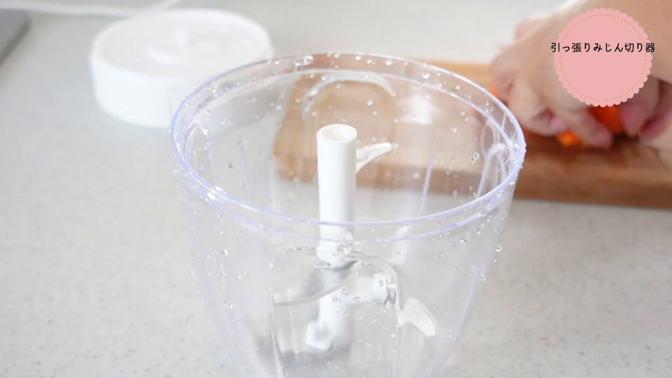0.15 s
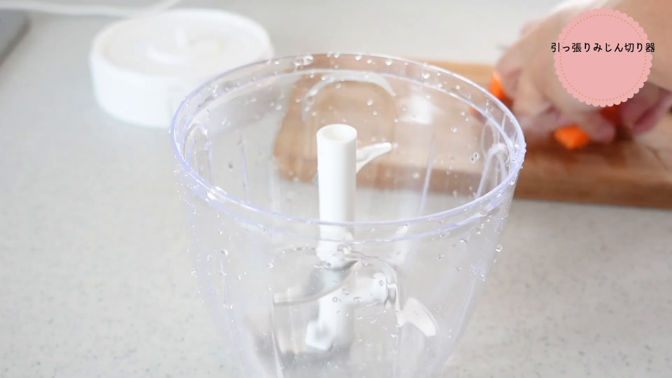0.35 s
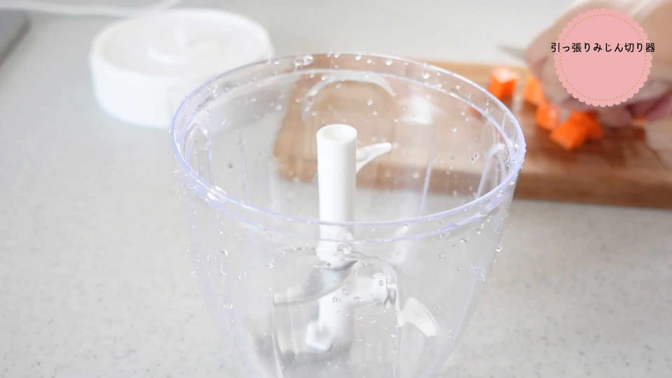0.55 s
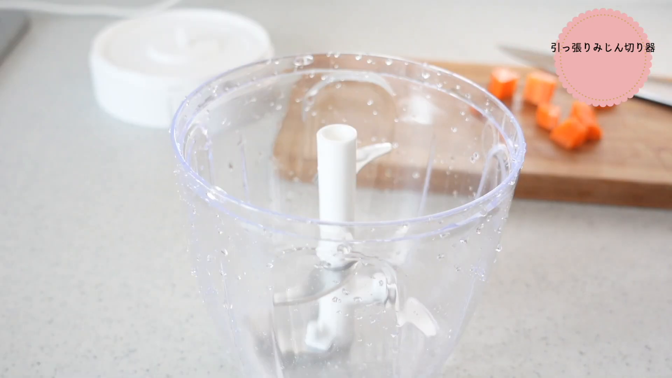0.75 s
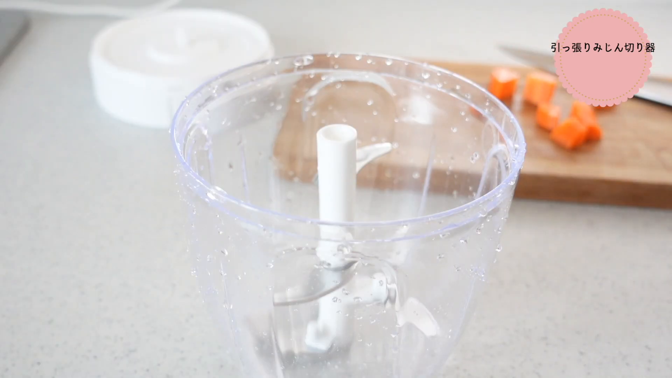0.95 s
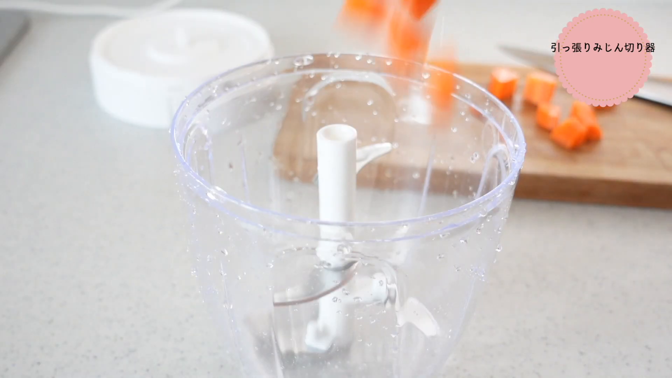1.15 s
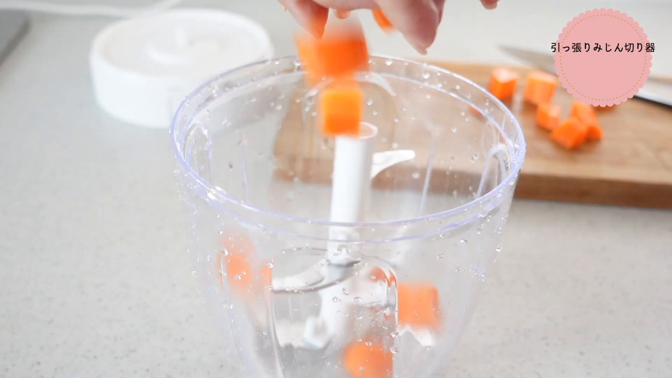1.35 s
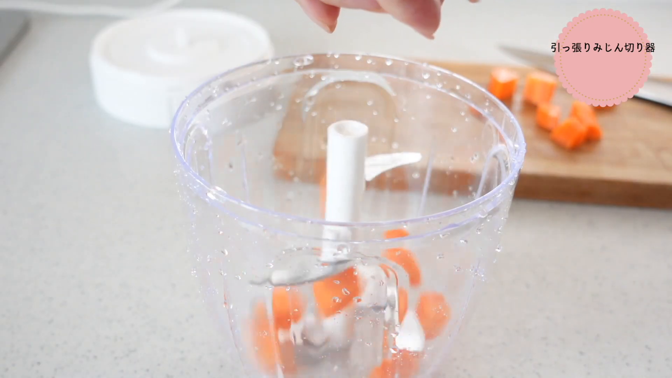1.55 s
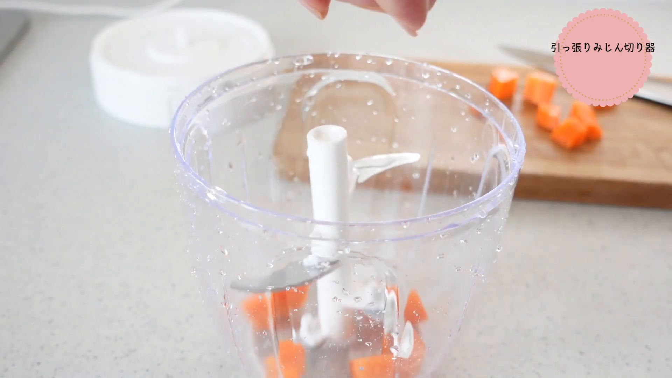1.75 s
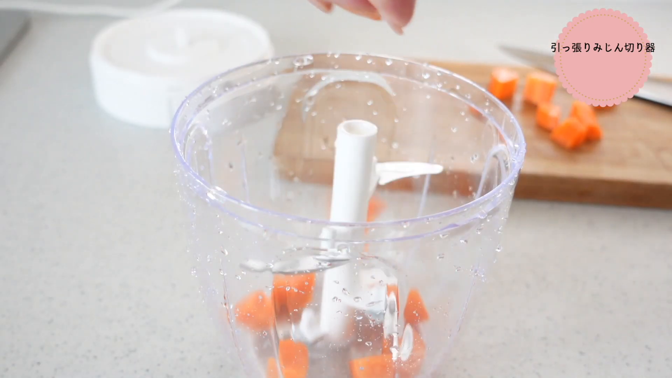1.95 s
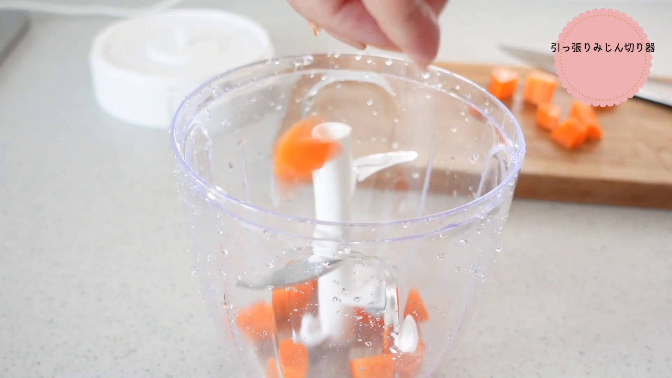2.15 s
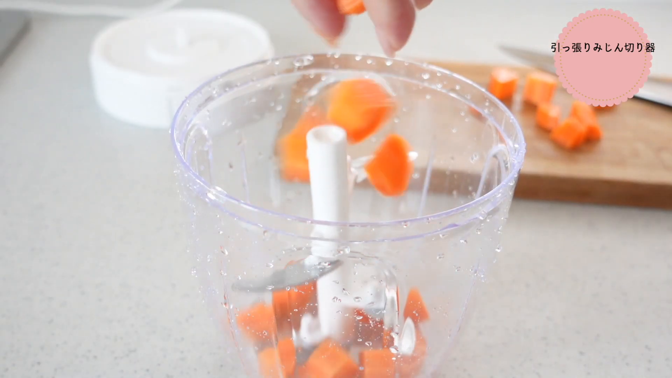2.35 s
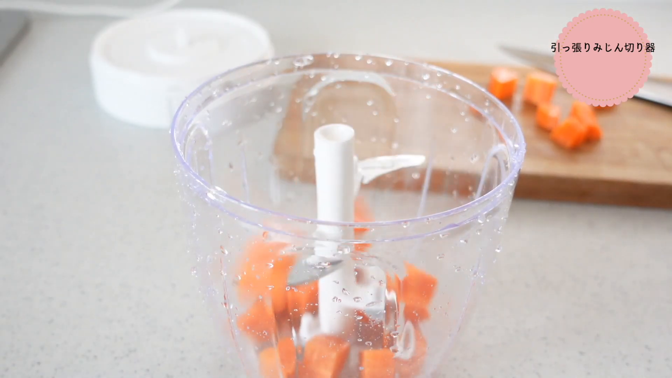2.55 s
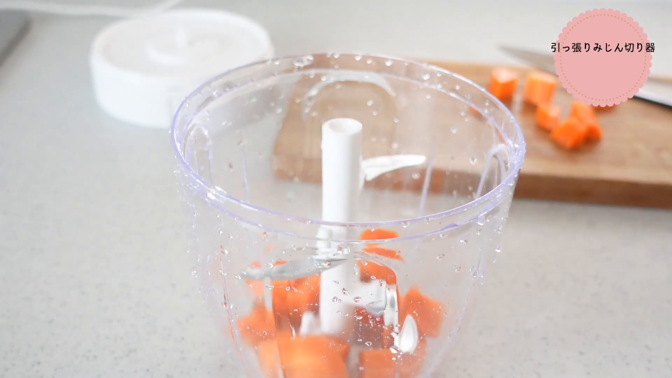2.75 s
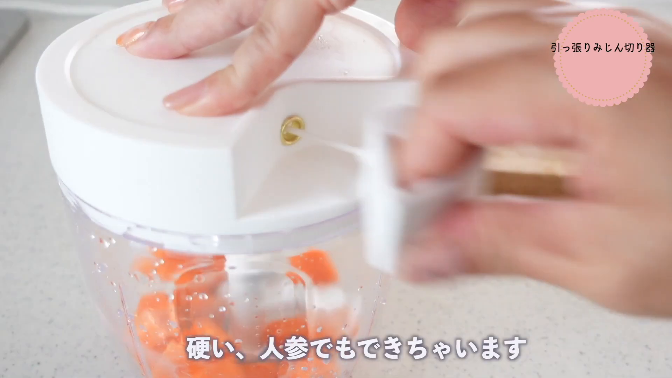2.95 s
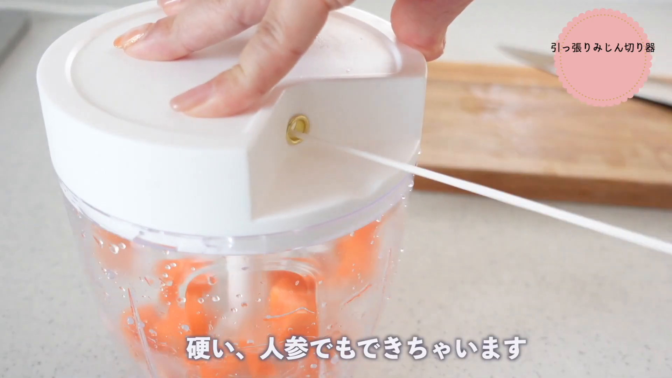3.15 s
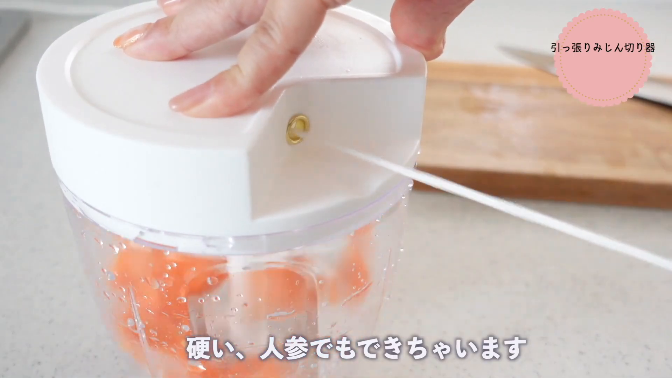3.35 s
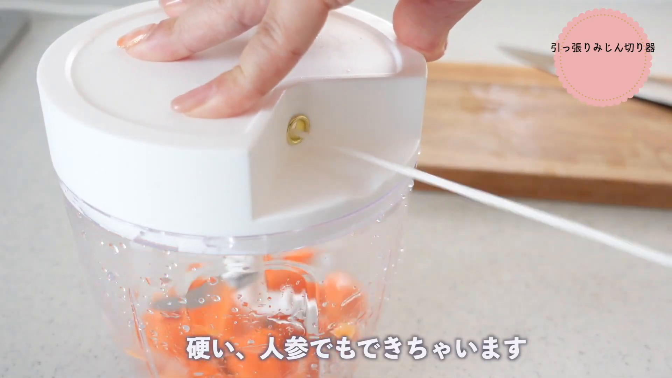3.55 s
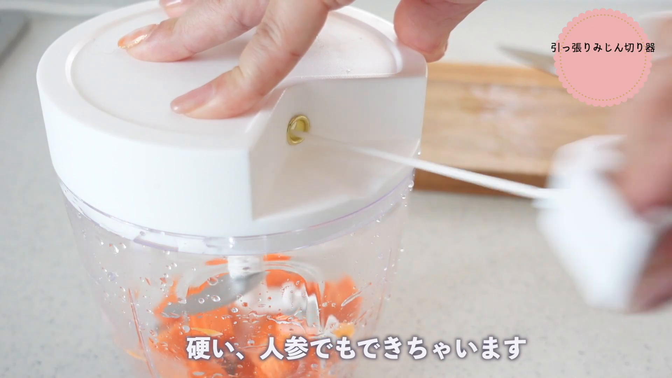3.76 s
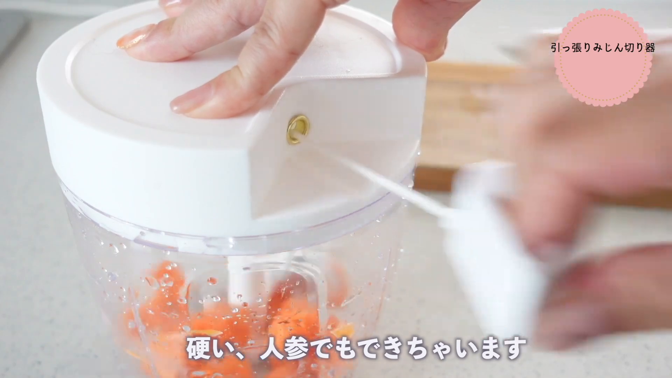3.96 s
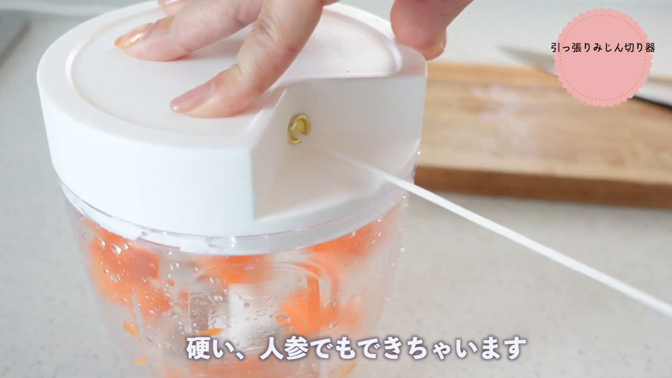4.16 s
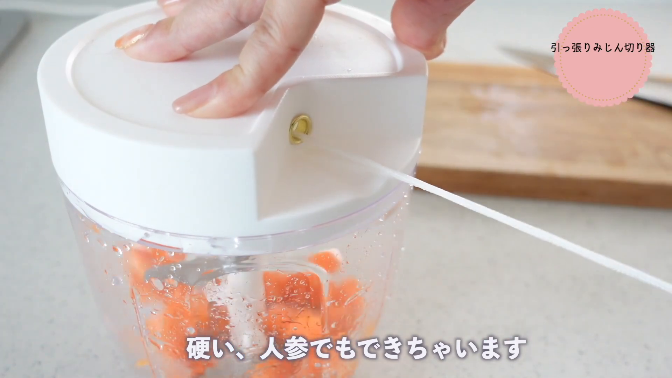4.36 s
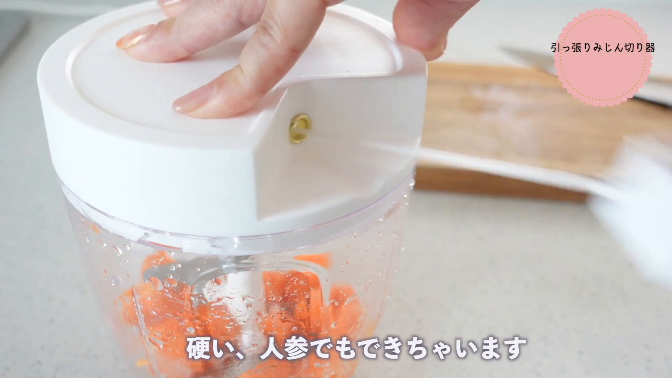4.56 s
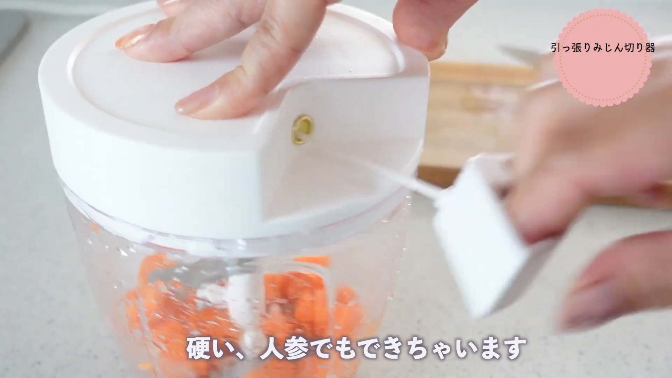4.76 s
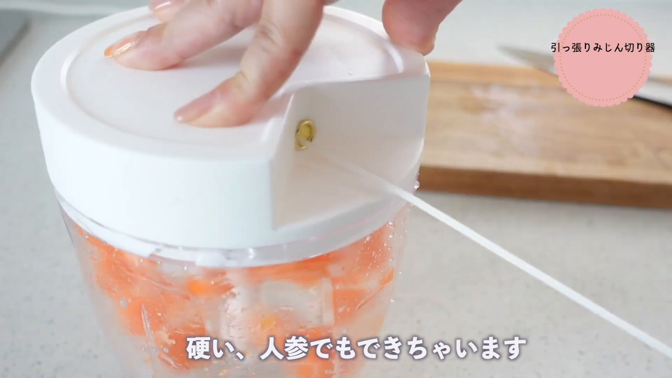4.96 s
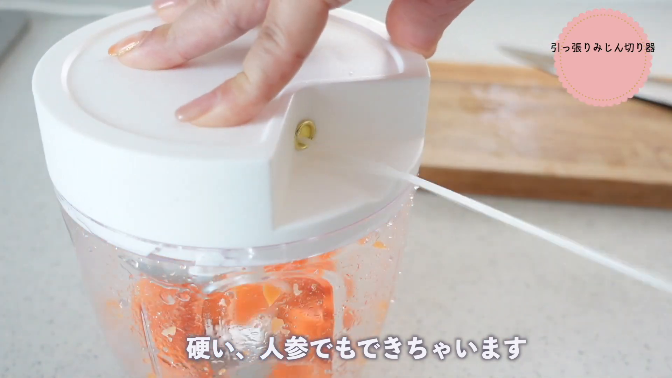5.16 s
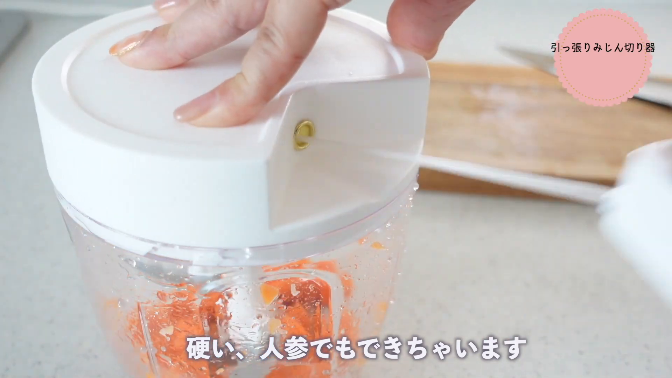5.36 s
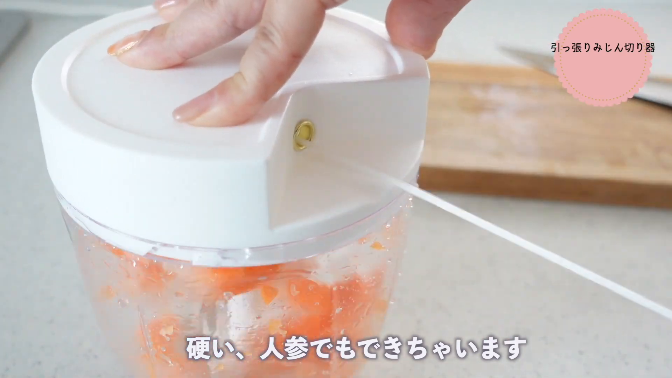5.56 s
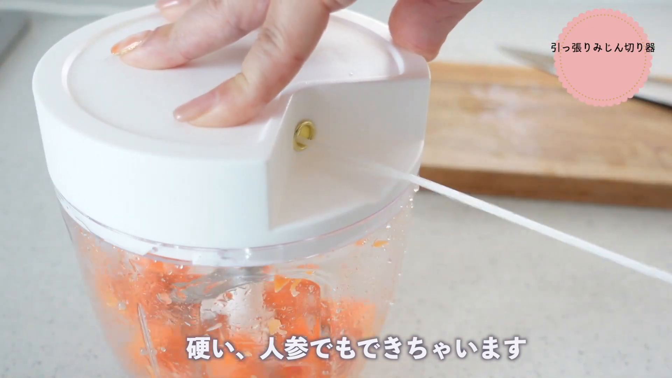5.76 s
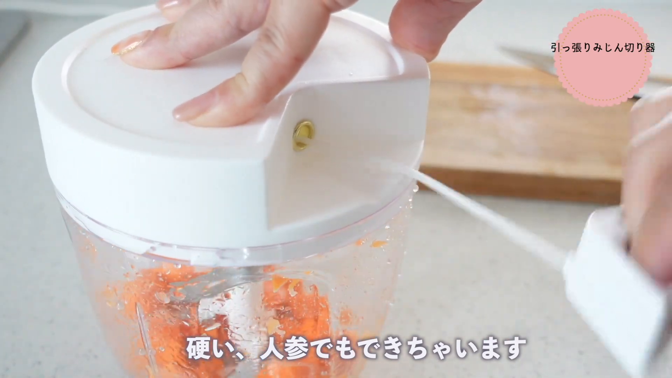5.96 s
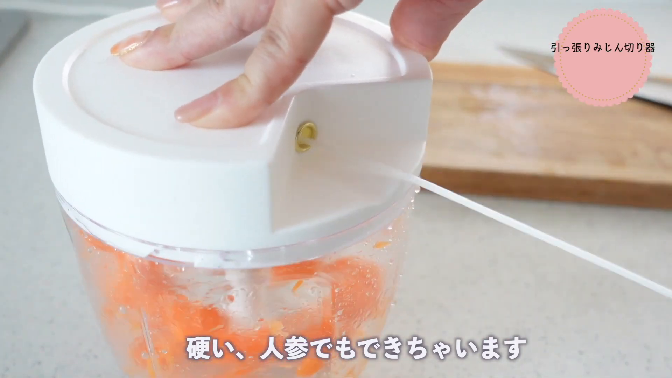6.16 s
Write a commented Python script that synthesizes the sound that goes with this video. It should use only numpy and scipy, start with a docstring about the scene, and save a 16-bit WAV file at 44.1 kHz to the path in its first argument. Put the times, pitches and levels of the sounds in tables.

```python
"""A pull-cord chopper on a kitchen counter: five yanks fling carrot pieces at the wall of its plastic bowl,
four rewinds run a ratchet, and reel and handle clack brightly on the lid.
First a hand gathers the cubes from a board and drops them in, so that bowl, shaft and blade ring.
Landings excite decaying sines; flung pieces, ratchet and hand are filtered grains; knocks are noise bursts.
A faint kitchen hush lies underneath, and a short room echo surrounds the near sounds."""
import sys
import numpy as np
from scipy import signal
from scipy.io import wavfile
from scipy.ndimage import uniform_filter1d

SR = 44100
rng = np.random.default_rng(int(sys.argv[2]) if len(sys.argv) > 2 else 0)


def master(y):
    """Save y as 16-bit WAV."""
    cut = np.clip(np.atleast_2d(y).T, -1, 1)
    pcm = np.round(cut * 32767)  # scale
    wavfile.write(sys.argv[1], SR, pcm.astype(np.int16))


N = 273420

# Quiet kitchen hush. Each row: frequency in Hz, relative spectrum level in dB.
HUSH_SPECTRUM = [(15, -73), (25, -47), (300, -12), (438, -12.5), (860, -4), (1560, -3), (2040, -2.5),
                 (2400, -10), (3410, -12), (4010, -8.5), (4460, -11.5), (9250, -21), (10000, -22.5),
                 (13100, -24), (15900, -33)]
HUSH_DB = -55.5

# Cubes pushed over the wood. Each row: start in seconds, length in seconds, level in dB.
SCUFFS = [(0.012, 0.044, -46.5), (0.285, 0.027, -51), (0.494, 0.0092, -37)]
# Fingers closing on the cubes. Each row: start in seconds, length in seconds, level in dB.
SQUEEZES = [(0.063, .08, -56.5), (0.267, 0.082, -43), (.365, 0.038, -41.5)]
SCUFF_RISE_S, SCUFF_FADE_DB_PER_S = 0.0051, 154
SQUEEZE_RISE_S, SQUEEZE_FADE_DB_PER_S = 0.042, 207
# Scuffed wood. Each row: frequency in Hz, relative spectrum level in dB.
SCUFF_SPECTRUM = [(88, -38), (150, -20), (805, 0), (1100, -6.5), (1710, -8), (2420, -41), (3000, -31),
                  (3900, -61), (6600, -120)]
# Wet crackle between the fingers. Each row: frequency in Hz, relative spectrum level in dB.
CRACKLE_SPECTRUM = [(1180, -18), (2000, -8), (2430, -18), (2970, -12.5), (4460, -9), (7260, -4),
                    (13300, -25.5), (15000, -34)]
# Cubes tapping on wood. Each row: start in seconds, level in dB, snap in Hz, relative decay in seconds.
BOARD_TAPS = [(.044, -29, 2020, .005), (.289, -23.5, 1500, 0.017), (.474, -29, 1550, .005),
              (.501, -25, 1560, 0.0046), (.521, -30, 1660, .005)]
# Thin ticks from the board. Each row: start in seconds, level in dB, snap in Hz, relative decay in seconds.
BOARD_TICKS = [(.386, -35, 4980, 0.0055), (1.001, -20, 3600, .002), (1.01, -36, 3720, .004)]
# Four kinds of blow. Each holds: body, snap and sizzle in dB, added to the level of the blow.
DULL_BLOW = (-12, -11, -26)
BRIGHT_BLOW = (-12, -10, -11.5)
SOFT_BLOW = (-10, -27, -31)
THIN_BLOW = (-33, -10.5, -46)

# Cubes landing in the bowl. Each row: start in seconds, ring in dB, part that rings most,
# clatter on the wall in dB, treble tick in dB.
LANDINGS = [(1.239, -21, "shaft", -40, -30.5), (1.258, -11.5, "shaft", -29, -37),
            (1.265, -6, "shaft", -11, -30), (1.274, -6.5, "shaft", -13, -26),
            (1.304, -11.5, "shaft", -23, -29), (1.34, 0, "shaft", -14.5, -23),
            (1.352, -3.5, "shaft", -4, -27), (1.377, -4, "foot", -12, -34), (1.398, -3, "shaft", -7.5, -18),
            (1.425, -7.5, "shaft", -22.5, -20.5), (1.439, -6, "shaft", -24, -29),
            (1.48, -7, "shaft", -16, -37), (1.506, -4.5, "shaft", -21, -17),
            (1.527, -3.5, "foot", -19, -26), (1.545, -14.5, "shaft", -38.5, -29),
            (1.565, -5, "shaft", -24, -30), (1.592, -3, "foot", -30, -22), (1.602, -8, "shaft", -20, -21.5),
            (1.635, -2, "foot", -26, -24), (1.661, -32, "shaft", -16, -40),
            (1.679, -19, "shaft", -24, -25.5), (1.72, -22.5, "bottom", -33, -37.5),
            (1.734, -36, "bottom", -28, -46), (1.748, -20.5, "foot", -47, -38.5),
            (1.777, -21, "bottom", -48, -51), (1.804, -21, "foot", -46, -39.5),
            (1.918, -7.5, "foot", -10, -30.5), (1.927, -18, "bottom", -32, -42),
            (2.016, -18, "bottom", -20.5, -58), (2.033, -7.5, "foot", -15.5, -26.5),
            (2.178, -1.5, "bottom", -19, -41), (2.187, -25, "shaft", -20, -39),
            (2.249, -21, "bottom", -61, -70), (2.268, -1.5, "blade", -19, -24),
            (2.282, -3.5, "blade", -10, -26), (2.349, -44, "bottom", -43, -68),
            (2.366, -2.5, "bottom", -19.5, -52), (2.373, -7, "blade", -20, -30.5),
            (2.385, 1, "bottom", -32, -51), (2.397, -3.5, "bottom", -7, -21.5),
            (2.433, -28, "blade", -18, -29.5), (2.457, -30, "bottom", -50, -30.5),
            (2.47, -3.5, "bottom", -33, -22), (2.486, -38, "foot", -12.5, -50.5),
            (2.503, -8.5, "bottom", -11.5, -27), (2.519, -42, "blade", -24, -53),
            (2.54, -3, "bottom", -31, -23.5), (2.554, -29, "bottom", -20, -24),
            (2.584, -19, "bottom", -43, -55.5), (2.615, -7.5, "blade", -27, -35.5),
            (2.63, -5.5, "blade", -18.5, -31), (2.65, -6.5, "blade", -27, -39),
            (2.713, -32, "foot", -33, -38.5), (2.796, -20, "bottom", -49, -47),
            (2.825, -38, "bottom", -46, -45.5)]
# What a blow on one part passes on. Each entry: part struck, then dB to bottom, blade and shaft.
PASSED_ON = {"shaft": (-15, -17.5, -3), "foot": (-4.5, -23.5, -10.5), "bottom": (-3.5, -21.5, -29),
             "blade": (-11.5, -8.5, -21.5)}
# Rings of the open bowl's bottom. Each row: frequency in Hz, relative level in dB, t60 in seconds.
BOTTOM_MODES = [(547, -13, 0.046), (664, -3.5, 0.021), (688, -0.5, 0.041), (728, -6, 0.011)]
# Rings of the shaft. Each row: frequency in Hz, relative level in dB, t60 in seconds.
SHAFT_MODES = [(1870, -11, 0.079), (1941, -6.5, 0.099), (1972, 0, 0.055), (2073, -9.5, 0.045),
               (2280, -18.5, 0.14)]
# Rings of the bowl wall. Each row: frequency in Hz, relative level in dB, t60 in seconds.
WALL_MODES = [(1450, -11, .035), (2420, -9, .045), (2670, -10, .04), (2930, -6, .07), (3250, -9, .035),
              (3730, -8, .045), (4060, -9, .04), (4450, -12, .04), (5100, -11, .035), (5720, -13, .035),
              (6600, -16, .025)]
# Bowl rocking on the counter. Each row: frequency in Hz, relative level in dB, t60 in seconds.
ROCKING_MODES = [(138, -23, 0.15), (191, -1, 0.092), (203, -22, 0.19), (279, 6, 0.084), (337.3, 2, 0.18)]
# Treble tick of a landing. Each row: frequency in Hz, relative spectrum level in dB.
TICK_SPECTRUM = [(59, -76), (100, -44), (265, -21), (460, -14), (718, -4.5), (907, -12.5), (4550, -16),
                 (12300, -39.5), (15900, -27)]
BLADE_HZ, BLADE_T60_S = 1066, 0.368  # the steel blade sings one note
TUMBLE_DB, SETTLE_DB_PER_S, TUMBLE_LEAST_DB = -21.5, 112, -52  # each landing stirs the pile, which then settles
SHAFT_GRAZE_DB = -14  # tumbling cubes barely touch the shaft

# Pulls; the first three rows are one pull that jams twice on whole cubes. Each row: start in seconds,
# spin-up in seconds, length in seconds, big chunks in dB, fine bits in dB, chunks coasting down in dB per second.
PULLS = [(2.922, .12, 0.15, -25, -26, 249), (3.094, 0.0046, 0.023, -24.5, -25, 250),
         (3.127, 0.031, .32, -20.5, -21, 86), (3.989, .065, .28, -19.5, -19, 114),
         (4.835, 0.021, 0.23, -20, -18.5, 97), (5.483, 0.055, 0.18, -19.5, -18, 80),
         (6.075, 0.052, .14, -20.5, -19, 90)]
BITS_SOONER, GEAR_SOONER = 1.58, 2.5  # how many times faster than the chunks they die away
GEAR_DB = -17.5  # the pawl buzzes under a pull, against the fine bits
# Rewinds. Each row: start in seconds, length in seconds, ratchet in dB, shaken chunks in dB,
# shaken bits in dB, running out in dB per second.
REWINDS = [(3.534, 0.26, -29, -26, -26, 89), (4.453, 0.12, -25.5, -22, -22, 104),
           (5.162, 0.17, -27, -28, -24.5, 127), (5.738, .22, -27.5, -27, -27, 240)]
REWIND_RISE_S, REWIND_SAG_DB = 0.054, -5.5
# Blade meeting the pile. Each row: time in seconds, mean passes per second, depth of the pulsing from 0 to 1.
BLADE_PASSES = [(2.98, 26, 0.93), (3.32, 25.6, 1), (3.501, 30, 0.4), (4.001, 40, 0), (6.2, 52, 0.02)]
# Big chunks. Each row: frequency in Hz, relative spectrum level in dB.
CHUNK_SPECTRUM = [(15, -82), (25, -70), (96, -38.5), (189, -21.5), (230, -23), (295, -11.5), (649, -2.5),
                  (980, 1.5), (1800, -6.5), (2340, -28), (3960, -120)]
# Fine bits. Each row: frequency in Hz, relative spectrum level in dB.
BIT_SPECTRUM = [(760, -29.5), (1300, -6), (2130, -6.5), (2410, -2), (2730, -4.5), (3780, -3), (6520, -12),
                (15900, -47)]
# Resonances of the shut bowl. Each row: frequency in Hz, width in Hz, relative lift in dB.
SHUT_BOWL_PEAKS = [(620, 130, -6), (1086, 170, -11), (1930, 79, -0.5), (2450, 280, -7.5), (3100, 54, -7),
                   (3730, 58, -5), (6380, 110, -4), (7500, 79, -46)]
# Ratchet. Each row: frequency in Hz, relative spectrum level in dB.
RATCHET_SPECTRUM = [(880, -30), (1500, -1), (3400, -13.5), (4360, 5.5), (5150, -3), (7720, -3), (10100, -7),
                    (11500, -8), (15900, -19.5)]
# Resonances of the pawl. Each row: frequency in Hz, width in Hz, relative lift in dB.
PAWL_PEAKS = [(2450, 340, -19), (4330, 200, -7.5), (5530, 190, -10), (6900, 270, -4.5), (7730, 370, -3.5),
              (7970, 100, -10), (9260, 170, -10), (11100, 210, -12.5)]
TEETH_PER_S = 105  # mean rate
# Dull knocks of big chunks and of the cord taking up the load. Each row: start in seconds, level in dB,
# snap in Hz, relative decay in seconds.
DULL_KNOCKS = [(2.928, -20, 1740, 0.012), (2.975, -12, 2410, .01), (3.02, -6, 3730, 0.039),
               (3.051, -9.5, 1950, 0.0069), (3.096, -11, 2150, 0.0029), (3.105, -13, 3640, 0.0029),
               (3.132, -7.5, 2480, 0.009), (3.166, -7, 2450, .011), (3.192, -8, 2390, 0.0091),
               (3.22, -9, 2400, .014), (3.252, -5, 2420, 0.013), (3.289, -5.5, 2420, 0.028),
               (3.414, -15, 2470, .015), (3.994, -13.5, 1875, 0.0079), (4.265, -14, 2400, .01),
               (4.3, -15, 2400, .007), (4.338, -13.5, 1900, 0.0051), (4.385, -20, 2000, 0.0053),
               (4.45, -19, 1670, 0.0068), (4.622, -18, 2400, 0.0092), (4.68, -20, 2400, 0.0081),
               (4.793, -8.5, 2800, 0.0075), (4.821, -16, 2700, 0.0058), (4.843, -4.5, 2020, 0.015),
               (5.372, -25, 1960, 0.005), (5.527, -12, 1710, 0.0054), (5.806, -6, 2550, .006),
               (5.904, -8.5, 1620, 0.018), (5.962, -27, 2500, 0.0098), (6.03, -4.5, 2840, 0.0048),
               (6.067, -9.5, 4400, 0.0068), (6.157, -4, 2520, 0.035)]
# Bright clacks of reel and handle on the lid. Each row: start in seconds, level in dB, snap in Hz,
# relative decay in seconds.
LID_CLACKS = [(3.438, -9, 3870, 0.034), (3.56, -10, 2440, 0.015), (3.653, -9, 4300, 0.018),
              (3.669, -10, 4300, 0.0083), (3.74, -2.5, 1560, 0.012), (3.96, -4, 4440, 0.011),
              (4.02, -7.5, 2450, 0.038), (4.44, -21, 3020, 0.0076), (4.472, -8.5, 4480, 0.013),
              (4.512, -4, 1560, 0.014), (4.555, -5.5, 2440, 0.012), (4.752, -5, 4300, 0.0085),
              (4.863, -6, 1700, 0.014), (5.186, -20, 1630, 0.014), (5.204, -22, 2440, 0.011),
              (5.333, -6, 1830, .008), (5.466, -3.5, 1600, 0.012), (6.023, -21, 4400, 0.0028),
              (6.061, -20, 4400, 0.0017)]

# Room echo. Each row: frequency in Hz, t60 in seconds.
ROOM_T60 = [(125, 1), (500, 0.35), (2000, 0.3), (6000, 0.27), (14000, 0.58)]
# Colour of the spread sound in the side signal. Each row: frequency in Hz, gain in dB.
SIDE_SPECTRUM = [(60, -42), (180, -39), (550, -11.5), (1650, -18), (4970, -24.5), (15000, -22)]
EDGE_HZ = 15900  # upper band limit


def amp(db):
    """Decibels to linear gain."""
    return 10 ** (np.asarray(db) / 20)


def evened(x):
    """Scale to an RMS of one."""
    return x / np.sqrt(np.mean(x ** 2) + 1e-20)


def read(points, hz):
    """Read a curve between its points, on a log frequency axis."""
    f, value = np.transpose(points)
    return np.interp(np.log(hz + 1), np.log(f + 1), value)


def colour(x, points, peaks=(), lift_db=0.):
    """Causal minimum-phase filter: a spectrum, with resonances lifted above it."""
    hz = np.abs(np.fft.fftfreq(8192, 1 / SR))
    gain = amp(np.maximum(read(points, hz), -100))
    lift = sum(amp(lift_db + db) / (1 + (2 * (hz - f) / width) ** 2) for f, width, db in peaks)
    gain = gain * (1 + lift)
    minimum_phase = np.exp(np.conj(signal.hilbert(np.log(gain))))
    taps = np.fft.ifft(minimum_phase).real[:4096]
    return signal.oaconvolve(x, taps)[:len(x)]


def band(x, lo_hz, hi_hz, order=2):
    """Keep only what lies between two frequencies."""
    return signal.sosfilt(signal.butter(order, [lo_hz, hi_hz], "bandpass", fs=SR, output="sos"), x)


def swell(start, rise_s, length, db, fall_db_per_s, sag_db=0.):
    """Gain over time: a straight rise, a hold that can sag, then a steady fall in dB."""
    t = np.arange(0, N, 16) / SR - start  # one value per 16 samples
    fall_db = fall_db_per_s * np.maximum(t - length, 0)
    level_db = db + sag_db * np.clip(t / length, 0, 1) - fall_db
    gain = np.clip(t / rise_s, 0, 1) * amp(level_db)
    return np.repeat(gain, 16)[:N]


def grains(per_s, spread_db, cycles, count=32):
    """Random impacts, a few of them large, each a short ring at one of many pitches."""
    size = amp(spread_db * np.minimum(rng.exponential(1, N), 3)) * (rng.random(N) < per_s / SR)
    size *= rng.choice([-1, 1], N)
    kind = rng.integers(0, count, N)
    t = np.arange(2048) / SR
    hz = np.geomspace(150, 15000, count)[:, None]
    rings = hz * np.sin(2 * np.pi * hz * t) * np.exp(-hz * t / cycles)
    return evened(sum(signal.oaconvolve(size * (kind == k), rings[k])[:N] for k in range(count)))


def puffs(blows, length_s):
    """A dying burst of noise after every blow."""
    envelope = signal.lfilter([1], [1, -np.exp(-1 / (length_s * SR))], blows)
    return rng.standard_normal(N) * envelope


def kitchen_hush():
    """Steady coloured noise, independent in mid and side."""
    return [amp(HUSH_DB) * evened(colour(x, HUSH_SPECTRUM)) for x in rng.standard_normal((2, N))]


def hand():
    """Cubes scuff and tap the wood and crackle wetly between the fingers."""
    scuff = evened(colour(grains(5000, 2.4, 3.6), SCUFF_SPECTRUM))
    scuff = scuff * sum(swell(s, SCUFF_RISE_S, length, db, SCUFF_FADE_DB_PER_S)
                        for s, length, db in SCUFFS)
    crackle = evened(colour(grains(8000, 1.6, 2.5), CRACKLE_SPECTRUM))
    crackle = crackle * sum(swell(s, SQUEEZE_RISE_S, length, db, SQUEEZE_FADE_DB_PER_S)
                            for s, length, db in SQUEEZES)
    return scuff + crackle + knocks(BOARD_TAPS, SOFT_BLOW) + knocks(BOARD_TICKS, THIN_BLOW)


def knocks(rows, kind, snap_width=1.21):
    """Short noise bursts with body, snap and sizzle, the higher parts dying faster."""
    out = np.zeros(N)
    t = np.arange(4096) / SR
    rise = 1 - np.exp(-t / .0002)
    wide = max(snap_width, 1.05)
    body_db, snap_db, sizzle_db = kind
    for s, level_db, snap_hz, decay_s in rows:
        decay_s = max(decay_s, .001)
        noise = rng.standard_normal((3, len(t)))
        # level in dB, band edges in Hz, share of the decay
        parts = [(body_db, 500, 1500, 1.2),
                 (snap_db, snap_hz / wide, snap_hz * wide, .8),
                 (sizzle_db, 4000, 13000, .7)]
        for x, (db, lo_hz, hi_hz, share) in zip(noise, parts):
            burst = band(x * np.exp(-t / (share * decay_s)) * rise, lo_hz, hi_hz, order=1)
            burst *= np.sqrt(0.0022 * SR) / np.linalg.norm(burst)  # same energy whatever the decay
            place = out[round(s * SR):][:len(t)]
            place += amp(level_db + db) * burst[:len(place)]
    return band(out, 350, 8300)


def drops(rattle_s=0.0086, rattle_per_s=600, rattle_db=-7.5, rolling_per_s=120):
    """Each cube strikes, then chatters for a few ms; smaller tumbles fill the gaps and rock the bowl."""
    # columns: start, level, dB passed to bottom, blade and shaft, then wall and tick against the level
    rows = np.array([(s, db, *PASSED_ON[part], wall_db - db, tick_db - db)
                     for s, db, part, wall_db, tick_db in LANDINGS])
    t = np.arange(2048) / SR
    draw = rng.random((len(rows), len(t)))
    chatter = amp(rattle_db) * (draw < rattle_per_s / SR) * np.exp(-t / rattle_s)
    chatter[:, 0] = 1  # the strike itself
    tumbles = stirred(rows) * (rng.random(N) < rolling_per_s / SR) * rng.exponential(1, N)

    def blows(column, tumble_db, size=len(t)):
        """Strikes, chatter and tumbles as one part receives them."""
        train = amp(tumble_db) * tumbles
        for row, hits in zip(rows, chatter):
            train[round(row[0] * SR):][:size] += amp(row[1] + row[column]) * hits[:size]
        return train

    wall_blows = blows(5, 2.0)
    first_touch = amp(-9.0) * band(blows(5, 10.0, size=1), 1800, 4500, order=1)  # sharp crack, no chatter
    rings = amp(-3.5) * ring(blows(2, 0.51), BOTTOM_MODES)
    rings += amp(-8.0) * blade(rows)
    rings += amp(-6.5) * ring(blows(4, SHAFT_GRAZE_DB), SHAFT_MODES)
    rings += amp(-9.5) * ring(wall_blows, WALL_MODES, 3.9)
    clatter = amp(-6.5) * band(puffs(wall_blows, 0.0061), 2300, 4040)
    ticks = amp(27.0) * colour(puffs(blows(6, -24.0), 0.0028), TICK_SPECTRUM)
    rocking = band(ring(amp(-24.5) * tumbles, ROCKING_MODES), 125, 340)
    return band(rings + first_touch + clatter + ticks, 715, 10100, order=3) + rocking


def stirred(rows):
    """Gain of the tumbling pile: up with a landing, down as it settles to a floor, silent from the first pull."""
    t = np.arange(N) / SR
    kick_db = np.full(N, -200.)
    kick_db[np.round(rows[:, 0] * SR).astype(int)] = rows[:, 1] + rows[:, 2:].max(1) + TUMBLE_DB
    settling_db = SETTLE_DB_PER_S * t
    held_db = np.maximum.accumulate(kick_db + settling_db) - settling_db
    dropping = (t > rows[0, 0]) * (t < PULLS[0][0])
    return amp(np.maximum(held_db, TUMBLE_LEAST_DB)) * dropping


def ring(blows, modes, spot_db=4.5):
    """Every blow lands on another spot, so each decaying mode answers with its own random weight."""
    t = np.arange(SR // 2) / SR
    out = np.zeros(N)
    for hz, db, t60 in modes:
        weight = rng.choice([-1, 1], N) * amp(spot_db * rng.standard_normal(N))
        mode = amp(db - 60 * t / t60) * np.sin(2 * np.pi * hz * t)
        out += signal.oaconvolve(blows * weight, mode)[:N]
    return out


def blade(rows):
    """A stronger strike takes over the blade's note with a fresh phase; a weaker one leaves it ringing."""
    t = np.arange(N) / SR
    at = np.round(rows[:, 0] * SR).astype(int)
    fall_db = 60 * t / BLADE_T60_S
    strike_db, phase = np.full(N, -200.), np.zeros(N)
    strike_db[at] = rows[:, 1] + rows[:, 3]
    phase[at] = 2 * np.pi * rng.random(len(at))
    held_db = np.maximum.accumulate(strike_db + fall_db)
    phase = np.cumsum(phase * (strike_db + fall_db >= held_db))  # only winning strikes shift it
    envelope = uniform_filter1d(amp(held_db - fall_db), 60)
    return envelope * np.sin(2 * np.pi * BLADE_HZ * t + phase)


def cord():
    """Gains of chunks, bits and ratchet over all pulls and rewinds."""
    gains = np.zeros((3, N))
    for start, rise_s, length, chunks_db, bits_db, coast in PULLS:
        layers = ((chunks_db, 1), (bits_db, BITS_SOONER), (bits_db + GEAR_DB, GEAR_SOONER))
        gains += [swell(start, rise_s, length, db, coast * sooner) for db, sooner in layers]
    for start, length, ratchet_db, chunks_db, bits_db, fall in REWINDS:
        gains += [swell(start, REWIND_RISE_S, length, db, fall, REWIND_SAG_DB)
                  for db in (chunks_db, bits_db, ratchet_db)]
    return gains


def flung(chunks_gain, bits_gain):
    """The spinning blade throws pieces at the wall: knocks of chunks and a hail of bits in the shut bowl."""
    passes = sweeps()
    chunks = passes * grains(4000, 3.2, 2.1) + amp(-6.5) * grains(400, 4.1, 2.76)
    bits = passes * grains(6000, 1.7, 1.56) + amp(-6.0) * grains(600, 2.8, 4.4)
    chunks = evened(colour(chunks, CHUNK_SPECTRUM, SHUT_BOWL_PEAKS, 0.96))
    bits = evened(colour(bits, BIT_SPECTRUM, SHUT_BOWL_PEAKS, 4.1))
    return chunks_gain * chunks + bits_gain * bits


def sweeps(jitter=0.131):
    """Each pass of a blade throws up a burst that thins until the next pass."""
    s, per_s, depth = np.transpose(BLADE_PASSES)
    t = np.arange(N) / SR
    wander = evened(uniform_filter1d(rng.standard_normal(N), 800))
    rate = np.interp(t, s, per_s) * (1 + jitter * wander)
    turns = np.cumsum(rate * (t > s[0])) / SR
    depth = np.clip(np.interp(t, s, depth), 0, 1)
    burst = uniform_filter1d(np.exp(-(turns % 1) / 0.84), 60)
    return evened(1 - depth + 2 * depth * burst)


def ratchet(gain, jitter=0.29, slip_db=-3.0):
    """The reel drags a pawl over its teeth at a wandering rate; the cord rasps between the clicks."""
    wander = evened(uniform_filter1d(rng.standard_normal(N), 400))
    turns = np.cumsum(TEETH_PER_S * (1 + jitter * wander)) / SR
    teeth = np.diff(np.floor(turns), prepend=0) * amp(3. * rng.standard_normal(N))
    drag = evened(puffs(teeth, 0.0057)) + amp(slip_db) * grains(6000, 0.61, 4.5)
    return gain * evened(colour(drag, RATCHET_SPECTRUM, PAWL_PEAKS, 10.0))


def room(x):
    """Sparse reflections of random sign, each band dying at its own speed."""
    taps = np.zeros((2, SR // 2))
    count = (SR // 2 - 201) // 20
    at = np.arange(200, SR // 2 - 20, 20) + rng.integers(0, 20, (2, count))  # one in every 20 samples
    np.put_along_axis(taps, at, rng.choice([-1., 1.], at.shape), 1)
    hz, t, z = signal.stft(taps, SR, nperseg=256)
    decay = amp(-60 * t / read(ROOM_T60, hz)[:, None])
    tail = signal.istft(z * decay, SR, nperseg=256)[1]
    return signal.oaconvolve(x[None], tail / np.linalg.norm(tail[0]), axes=1)[:, :N]


def scene():
    """Mix all sources with the room and spread them as mid plus and minus side."""
    board = hand()
    chunks_gain, bits_gain, reel_gain = cord()
    near = drops() + flung(chunks_gain, bits_gain) + ratchet(reel_gain)
    near += knocks(DULL_KNOCKS, DULL_BLOW) + knocks(LID_CLACKS, BRIGHT_BLOW) + board
    wet = room(near)
    hush = kitchen_hush()
    mid = near + amp(-9.5) * wet[0] + hush[0]
    # a short random filter spreads the near sounds into the side signal
    spread = np.convolve(near, rng.standard_normal(90) * np.hanning(90) / 6)[:N]
    side = colour(amp(-10.0) * wet[1] + amp(-7.5) * spread, SIDE_SPECTRUM) + amp(-0.5) * hush[1]
    side += amp(-8.5) * band(np.roll(board, 4), 1400, 14000)  # the board stands off to one side
    return np.array([mid + side, mid - side])


def record(dry, ceiling=1.13):
    """The input rounds off the highest peaks and cuts the rumble; then comes the upper band limit."""
    rounded = ceiling * np.tanh(dry / ceiling)
    thinned = signal.sosfilt(signal.butter(1, 90, "highpass", fs=SR, output="sos"), rounded)
    lowpass = signal.firwin(1023, EDGE_HZ, window=("kaiser", 9), fs=SR)
    return signal.oaconvolve(thinned, lowpass[None], "same")


dry = scene()
out = record(dry)
master(out)
```